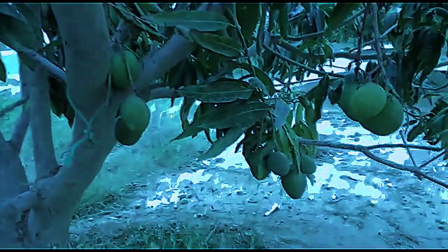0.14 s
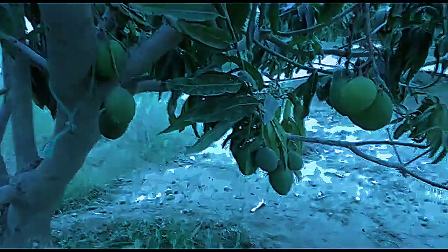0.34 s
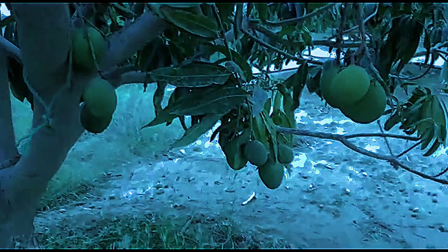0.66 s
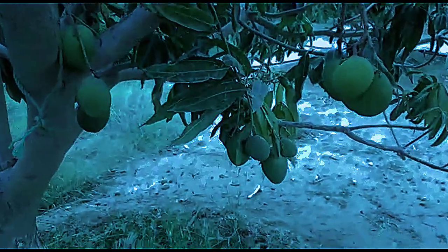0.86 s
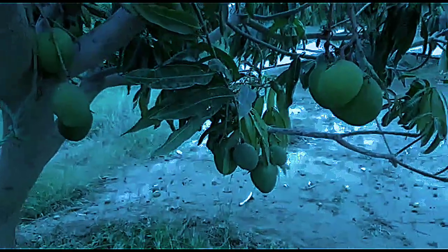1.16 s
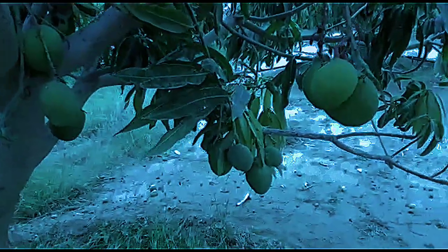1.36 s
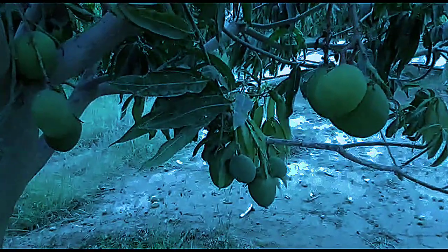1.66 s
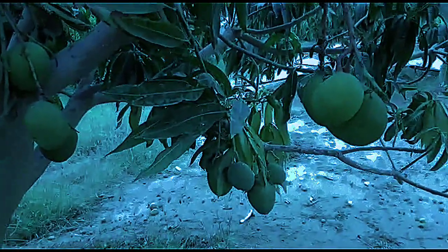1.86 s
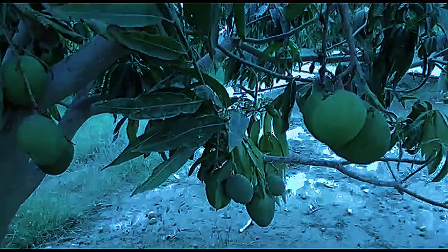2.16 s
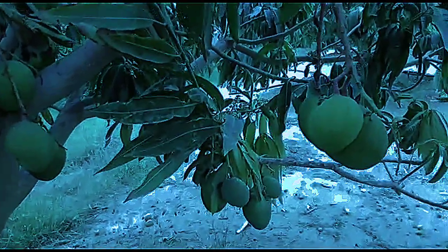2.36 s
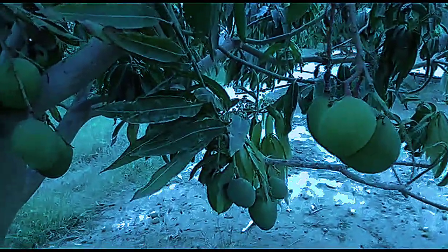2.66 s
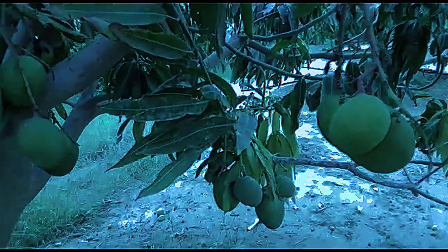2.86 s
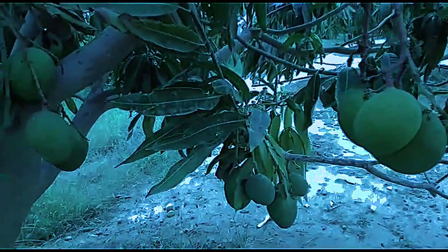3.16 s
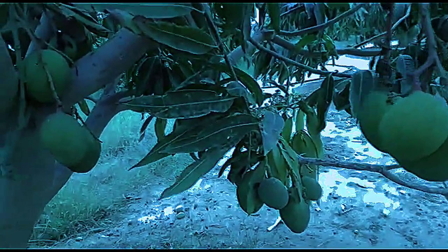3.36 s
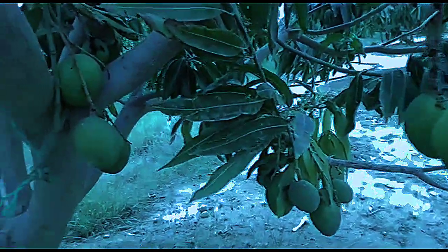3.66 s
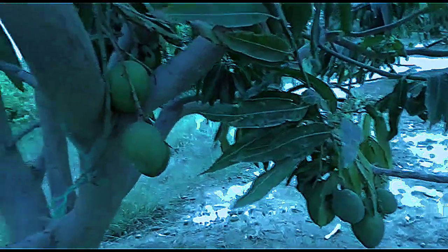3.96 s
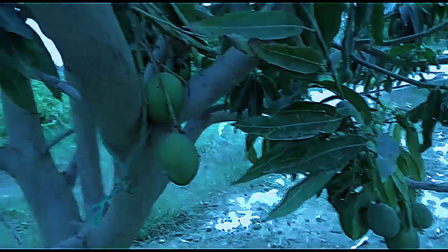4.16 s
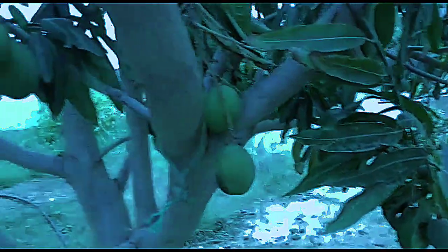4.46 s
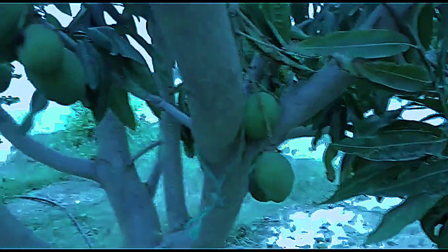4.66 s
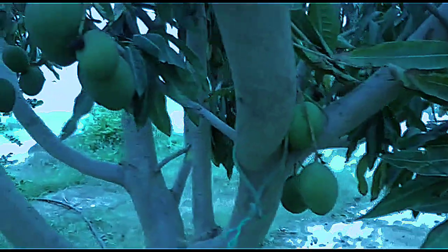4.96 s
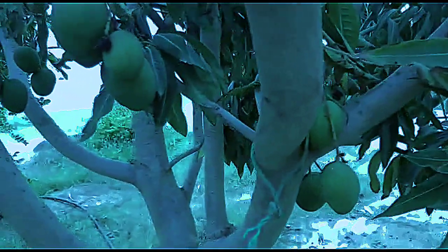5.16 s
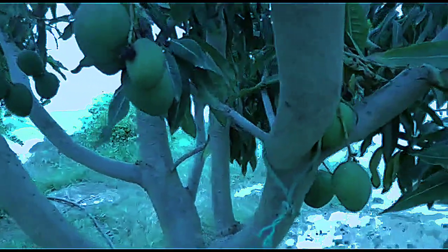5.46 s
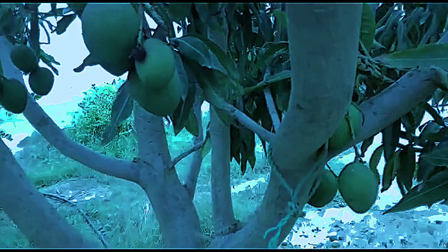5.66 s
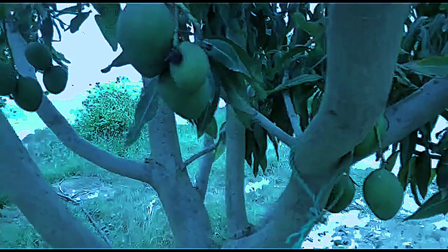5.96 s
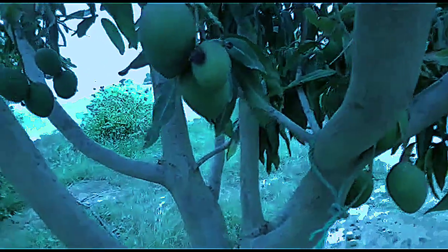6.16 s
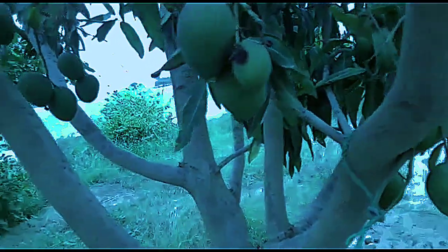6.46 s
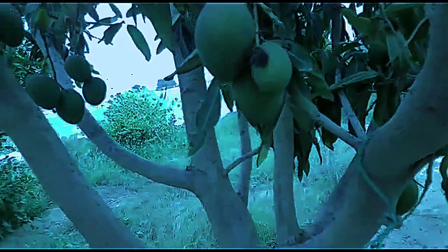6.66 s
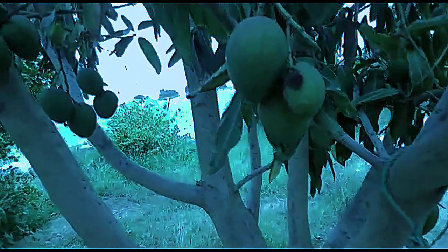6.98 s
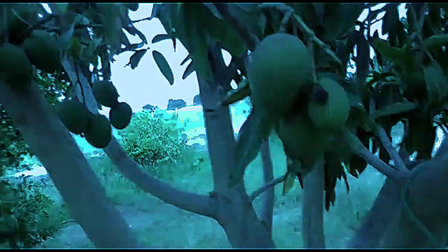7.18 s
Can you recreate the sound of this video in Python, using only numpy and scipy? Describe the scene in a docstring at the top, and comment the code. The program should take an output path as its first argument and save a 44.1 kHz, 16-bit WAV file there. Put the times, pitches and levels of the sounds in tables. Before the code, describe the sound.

Outdoors among fruit trees, birds chirp and squawk in an irregular stream, each raspy call drawing a fainter reply. Low rumble, wind on the microphone and faint far twitter lie behind them. Short mellow whistles from one bird peak just after a brief dropout near three seconds and stop around four. The chirping continues, with a sharp peep at five seconds and a tiny dry tick soon after.

```python
"""A flock chatters in an orchard: each cheep is a harsh squawk, a falling arch and a lower after-note,
and draws a fainter reply. Thin peeps and one bird's fluty whistles fall in between. Calls come from
vibrating syrinx membranes; leaves and trunks scatter them. Behind: far twitter, faint long tones, wind
buffeting, rumble, hiss, a distant hum and one dry tick.
Near 2.8 s the sound cuts out for a moment; the background swells back, the bass last."""
import sys
import numpy as np
from scipy import signal
from scipy.fft import rfft, irfft, next_fast_len
from scipy.io import wavfile
from scipy.ndimage import uniform_filter1d, map_coordinates

SR = 44100
rng = np.random.default_rng(int(sys.argv[2]) if len(sys.argv) > 2 else 0)


def master_out(mix):
    """Clip the mix to full scale and print it as 16-bit PCM to the path in sys.argv[1]."""
    frames = np.transpose(np.atleast_2d(mix))
    ceiling = np.clip(frames, -1, 1)
    pcm = np.round(ceiling * 32767).astype(np.int16)
    wavfile.write(sys.argv[1], SR, pcm)


N = 322812

# Flock calls. Each row: start in seconds, arch length in seconds, top pitch in Hz, arch level in dB,
# rasp 0-1, squawk level in dB, after-note level in dB.
CHEEPS = [(.01, .045, 5110, -15.5, 0.37, -24, -20.5), (.095, 0.059, 4930, -15.5, .8, -31.5, -22.5),
          (0.232, 0.059, 4730, -21, .9, -39, -32), (0.431, 0.059, 5370, -28, .7, -45, -36),
          (0.527, .042, 5200, -19, 0.34, -26.5, -23.5), (0.712, 0.097, 4695, -15.5, 0.56, -25, -21),
          (1.34, 0.059, 6290, -13, 0.5, -29.5, -13.5), (1.505, 0.068, 5050, -15.5, 0.37, -21.5, -15.5),
          (2.004, 0.11, 5330, -28, 0.65, -47, -31.5), (2.191, 0.095, 4954, -16, 0.99, -22, -22),
          (2.89, 0.069, 5460, -32.5, 0.62, -50, -29), (3.107, 0.042, 4680, -22, 0.38, -28, -22.5),
          (3.238, .045, 4956, -11.5, .2, -20.5, -28), (3.6, .07, 4800, -21, 0.76, -29, -28.5),
          (3.977, 0.061, 5130, -20, 0.32, -31.5, -24), (4.21, 0.093, 4834, -19.5, 0.84, -23.5, -21.5),
          (4.37, 0.053, 5060, -21.5, 0.65, -34.5, -28.5), (4.886, 0.056, 4350, -22, 0.37, -29.5, -21),
          (4.99, 0.12, 4470, -20.5, 0.49, -21, -25.5), (5.205, .07, 4200, -21, 0.3, -33.5, -30),
          (5.534, 0.056, 4510, -24.5, 0.28, -42, -35), (5.78, 0.11, 4410, -21, 1, -30.5, -34),
          (5.995, 0.076, 5020, -22.5, 0.82, -30, -30), (6.166, .06, 5120, -17.5, 0.2, -26.5, -25.5),
          (6.42, 0.057, 5050, -16.5, 0.26, -27.5, -20.5), (6.592, .075, 4720, -21.5, 0.9, -24, -29.5),
          (6.973, 0.072, 4780, -22.5, .4, -32, -20.5), (7.301, 0.065, 5520, -29, 0.4, -32.5, -30)]
# Background trend. Each row: time in seconds, rumble gain in dB, hiss gain in dB.
AIR_GAINS = [(0, -13.5, -29.5), (2.7, -14, -31), (3.4, -22.5, -26), (4.7, -21.5, -31.5),
             (7.3, -21.5, -30.5)]
ARCH_TURN, SLUR_TURN = .25, .38  # share of a note's length at which it reaches its main pitch


def amp(db):
    """Decibels to gain."""
    return 10 ** (np.asarray(db) / 20)


def unit(x):
    """Scale to rms 1."""
    return x / np.sqrt(np.mean(x ** 2) + 1e-20)


def along(points, hz):
    """Interpolate (Hz, value) points on a log axis."""
    knots_hz, values = np.transpose(points)
    return np.interp(np.log(hz + 1), np.log(knots_hz + 1), values)


def curves(rows):
    """One value per sample for each column after the time."""
    times_s, *columns = np.transpose(rows)
    return [np.interp(np.arange(N) / SR, times_s, column) for column in columns]


def wobble(rate_hz, size=N):
    """Smooth random curve, rate_hz knots a second."""
    knots = rng.standard_normal(size // 8 + 4)
    place = np.arange(size) * rate_hz / SR
    return map_coordinates(knots[:int(place[-1]) + 4], [place], mode="nearest")


def filtered(x, response):
    """Apply a gain given as a function of Hz."""
    size = next_fast_len(len(x) + 8192)
    return irfft(rfft(x, size) * response(np.fft.rfftfreq(size, 1 / SR)), size)[:len(x)]


def coloured(x, spectrum):
    """Equalise by (Hz, dB) points."""
    return filtered(x, lambda hz: amp(along(spectrum, hz)))


def noise(spectrum):
    """Coloured noise of rms 1."""
    return unit(coloured(rng.standard_normal(N), spectrum))


def add(track, start_s, sound):
    """Mix a sound into a track."""
    start = min(max(round(start_s * SR), 0), N)
    track[start:start + len(sound)] += sound[:N - start]


def progress(length_s):
    """Position 0-1 within a call, on a half-second buffer."""
    return np.minimum(np.arange(SR // 2) / SR / max(length_s, .005), 1)


def voiced(wave, u, edge):
    """Open and close a call softly; rms 1 while it lasts."""
    call = wave * np.abs(np.sin(np.pi * u)) ** edge
    return unit(call[u < 1])


def syrinx(glide_hz, twist, jitter, harmonics_db):
    """One vibrating membrane: its pitch twists and jitters about a glide."""
    size = len(glide_hz)
    hz = glide_hz * (1 + twist * wobble(150, size) + jitter * wobble(1200, size))
    phase = 2 * np.pi * np.cumsum(hz) / SR
    return sum(amp(db) * np.sin(k * phase) * (k * hz < SR / 2) for k, db in enumerate(harmonics_db, 1))


def syllable(length_s, pitches_hz, rasp, harmonics_db, edge, bow, turn=SLUR_TURN):
    """Three-pitch glide; rasp twists it, adds hiss and wakes the lower second side of the syrinx."""
    u = progress(length_s)
    start_hz, main_hz, end_hz = pitches_hz
    approach = np.abs(1 - u / turn) ** 1.5
    after = np.abs((u - turn) / (1 - turn))
    # bow 1 leaves the main pitch ever faster, bow 0 leaves at once and levels out
    leave = bow * after ** 2 + (1 - bow) * np.sin(np.pi / 2 * after) ** 1.4
    glide_hz = main_hz + np.where(u < turn, (start_hz - main_hz) * approach, (end_hz - main_hz) * leave)
    first = syrinx(glide_hz, .008 + .035 * rasp, .01 + .035 * rasp, harmonics_db)
    second = syrinx(.85 * glide_hz, .02 + .06 * rasp, .04, harmonics_db)
    hiss = rng.standard_normal(len(u))
    flutter = amp((1.5 + 2.5 * rasp) * wobble(380, len(u)))
    return voiced((first + rasp * (.75 * second + .3 * hiss)) * flutter, u, edge)


def slur(hz, slide_hz):
    """Start, main and end pitch of a note that does most of its slide early; both ends droop."""
    early_share, droop = .68, .0392
    ends_hz = hz * (1 - droop)
    return ends_hz - early_share * slide_hz, hz, ends_hz + (1 - early_share) * slide_hz


def scatter(x, early_db, tail_db, reach_s, perches=24):
    """Ground and trunks echo each perch differently; foliage adds a diffuse tail."""
    # Foliage decay. Each row: frequency in Hz, T60 in seconds.
    grove_t60 = [(500, 0.13), (2500, 0.79), (4200, 0.64), (9000, 0.53), (14000, 0.53)]
    out, hop = x.copy(), N // perches + 1
    for i in range(perches + 1):
        crossfade = np.clip(1 - np.abs(np.arange(N) / hop - i), 0, 1)
        first = max(i - 1, 0) * hop
        hz, t, spectra = signal.stft(rng.standard_normal(SR // 2), SR, nperseg=256)
        decay = amp(-60 * t / along(grove_t60, hz)[:, None])
        build_up = 1 - np.exp(-t / .045)
        tail = signal.istft(spectra * decay * build_up, SR, nperseg=256)[1]
        echo = amp(tail_db) * tail / np.linalg.norm(tail)
        lateness = rng.random(10) ** 2
        trunks = rng.standard_normal(10) * amp(-9 * lateness)
        delays_s = .001 + reach_s * lateness
        echo[(SR * delays_s).astype(int)] += amp(early_db) * trunks / np.linalg.norm(trunks)
        add(out, first / SR, signal.fftconvolve((x * crossfade)[first:(i + 1) * hop], echo))
    return out


def buffeting():
    """Wind on the microphone, with two short puffs."""
    # Spectrum. Each row: frequency in Hz, density in dB.
    spectrum = [(15, -5), (30, -1.5), (60, 0.5), (100, -2), (160, -11.5), (300, -24.5), (800, -101)]
    # Wind strength. Each row: time in seconds, gain in dB.
    wind = [(0, -16.5), (2.7, -13.5), (3.2, -18), (5.4, -20), (6.3, -15), (7.3, -18)]
    # Puffs. Each row: start in seconds, length in seconds, gain in dB.
    puffs = [(5.618, 0.045, -9), (6.822, 0.056, -11.5)]
    t = np.arange(N) / SR
    bumps = sum(amp(db) * np.exp(-(2 * (t - start_s) / length_s - 1) ** 2)
                for start_s, length_s, db in puffs)
    return (amp(curves(wind)[0] + .8 * wobble(12)) + bumps) * noise(spectrum)


def rumble():
    """Low, distant rumble."""
    # Spectrum. Each row: frequency in Hz, density in dB.
    spectrum = [(50, -27.5), (120, 1), (200, 0), (350, -0.5), (480, -6), (650, -13), (1100, -19.5),
                (3000, -46)]
    return amp(curves(AIR_GAINS)[0] + .5 * wobble(6)) * noise(spectrum)


def hum():
    """Distant hum: two tones waver in level and pitch."""
    # Tones. Each row: frequency in Hz, relative level in dB.
    tones = [(157, -33), (293, -28.5)]
    # Swell. Each row: time in seconds, gain in dB.
    swell = [(0, -26), (2.8, -1.5), (3.3, 2.5), (6, 3.5), (7.3, -9.5)]
    track = np.zeros(N)
    for hz, db in tones:
        gain = amp(db + 2 * wobble(14))
        phase = 2 * np.pi * np.cumsum(hz * (1 + .013 * wobble(20))) / SR
        track += gain * np.sin(phase)
    return track * amp(curves(swell)[0])


def open_air():
    """Hiss of open country."""
    # Spectrum. Each row: frequency in Hz, density in dB.
    spectrum = [(300, -24), (700, 0.5), (1400, -2.5), (2200, -1.5), (3000, -10.5), (5000, -6.5), (6800, -9),
                (8700, -6.5), (10500, -10.5), (12000, -15), (14000, -27.5)]
    return amp(curves(AIR_GAINS)[1] + .5 * wobble(4)) * noise(spectrum)


def far_flock(count=130):
    """Birds deeper in the orchard chirp at random."""
    track = np.zeros(N)
    for i, (when, size, pitch, bend, loud) in enumerate(rng.random((count, 5))):
        pitches_hz = (2600 + 2700 * pitch) * np.array([.87 + .32 * bend, 1, .8])
        call = syllable(.03 + .04 * size, pitches_hz, rasp=.45, harmonics_db=[0, -18], edge=.8, bow=.3)
        add(track, (i + when) * N / SR / count, amp(-40 + 2.4 * loud + 4 * pitch) * call)
    return scatter(track, early_db=-2, tail_db=-3, reach_s=.12)


def squawks():
    """Both sides of a forced syrinx swing apart: two twisting, sagging harmonic stacks in some noise."""
    # Squawk colour. Each row: frequency in Hz, gain in dB.
    colour = [(1500, -34), (2500, -22.5), (3500, 13), (5200, 14.5), (6500, 6), (8500, 7.5), (10300, 1.5),
              (11600, -4.5), (14000, -8)]
    lead_s, hold_s, third_harmonic_hz = .024, .05, 6474
    harmonics_db = [0, -3, -2, 0, -3, -6]
    track = np.zeros(N)
    for start_s, arch_s, _, _, _, db, _ in CHEEPS:
        u = progress(hold_s + .7 * arch_s)
        glide_hz = third_harmonic_hz / 3 * (1.04 + .3 * u - .42 * u * u)
        sides = np.zeros(len(u))
        for ratio in (1, 1.17):
            side = syrinx(glide_hz * ratio, twist=.065, jitter=.02, harmonics_db=harmonics_db)
            sides += side * amp(3.5 * wobble(170, len(u)))
        hiss = .45 * rng.standard_normal(len(u))
        call = voiced(unit(sides) + hiss, u ** .69, edge=.65)  # peaks early, fades slowly
        add(track, start_s - lead_s, amp(db) * call)
    return scatter(coloured(track, colour), early_db=-7, tail_db=-2.5, reach_s=.06)


def cheep_notes():
    """Each arch, its after-note and a farther bird's reply; raspy calls sink further."""
    pause_s, note_s, reply_loss_db = .004, .06, 5.5
    notes = []
    for start_s, length_s, top_hz, db, rasp, _, after_db in CHEEPS:
        wait, pitch, bend = rng.random(3)
        sag = 1 - .17 * rasp
        arch = np.array([.82, 1, .79 * sag])
        hump = np.array([.95, 1, .96 * sag + .0855 * (2 * bend - 1)])
        after_hz = (2010 + .45 * top_hz) * sag * hump
        reply_hz = (3893 + 700 * pitch) * arch
        reply_start_s = start_s + .13 + .08 * wait
        notes += [(start_s, length_s, top_hz * arch, db, rasp, ARCH_TURN),
                  (start_s + length_s + pause_s, note_s, after_hz, after_db, .894 * rasp, SLUR_TURN),
                  (reply_start_s, note_s, reply_hz, after_db - reply_loss_db, .55, ARCH_TURN)]
    return notes


def peep_notes(rasp=.22):
    """Short, thin notes that flick upward or stay nearly level."""
    # Each row: start in seconds, length in seconds, pitch in Hz, slide in Hz, level in dB.
    peeps = [(0.07, 0.031, 3810, 1100, -13.5), (.591, 0.025, 6860, 2026, -22),
             (0.615, 0.026, 4250, 810, -19), (0.821, 0.021, 4450, -400, -16),
             (1.761, 0.04, 4500, 1100, -22), (2.156, 0.019, 6000, 1800, -27),
             (4.194, .028, 5950, 700, -18.5), (4.901, 0.038, 5200, 1102, -14.5),
             (5.003, 0.03, 6480, -200, -6.5), (5.087, 0.026, 5300, 100, -16),
             (5.142, 0.019, 5300, 150, -20.5), (5.755, 0.045, 5900, 1500, -21.5),
             (5.975, 0.0238, 5200, 1400, -21), (6.272, .022, 3830, 700, -25),
             (6.47, 0.015, 5800, 1387, -22), (6.802, 0.067, 5450, 170, -28)]
    return [(start_s, length_s, slur(hz, slide_hz), db, rasp, SLUR_TURN)
            for start_s, length_s, hz, slide_hz, db in peeps]


def chirps():
    """Cheeps and peeps, clean to raspy; more of a faint bird's call arrives as echoes."""
    # Chirp colour. Each row: frequency in Hz, gain in dB.
    colour = [(2000, -1.5), (6500, 2), (7200, -7), (8700, 0), (10500, 3), (11600, -4.5), (14000, -16)]
    near, far = np.zeros(N), np.zeros(N)
    for start_s, length_s, pitches_hz, db, rasp, turn in cheep_notes() + peep_notes():
        call = syllable(length_s, pitches_hz, rasp, [0, -19.5, -26], edge=.45, bow=.1, turn=turn)
        add(near if db > -21 else far, start_s, amp(db) * call)
    near = scatter(near, early_db=-6, tail_db=-12, reach_s=.12)
    far = scatter(far, early_db=-2, tail_db=-5, reach_s=.05)
    return coloured(near + amp(-2) * far, colour)


def whistles():
    """One bird's mellow, burred slurs, with a thin glint on the fourth harmonic."""
    # Each row: start in seconds, length in seconds, pitch in Hz, slide in Hz, level in dB.
    notes = [(0.166, 0.046, 2710, 0, -17.5), (0.298, 0.1, 2460, -380, -22), (0.415, 0.038, 2610, -690, -27),
             (1.23, 0.061, 2350, 288, -30), (1.723, 0.027, 1820, 160, -31), (1.88, 0.052, 2390, 193, -23.5),
             (2.071, .052, 2594, 405, -18.5), (2.277, .049, 2120, -100, -33.5),
             (2.525, 0.018, 2250, 65, -22), (2.591, 0.069, 2660, 250, -24),
             (2.645, 0.079, 2474, -420, -24.5), (2.98, 0.035, 1850, 70, -31), (3.12, .057, 2422, 210, -7.5),
             (3.175, 0.048, 2343, 296, -18), (3.246, 0.023, 1830, -92, -24), (3.31, 0.051, 2608, 398, -7.5),
             (3.343, 0.07, 2974, 60, -18), (3.527, 0.021, 2140, 496, -14.5),
             (3.591, 0.038, 2580, -590, -20), (3.659, 0.026, 2046, -380, -24.5),
             (3.733, 0.032, 2280, 318, -12), (3.818, 0.051, 2664, 1, -14.5),
             (3.866, 0.046, 2930, -250, -21), (3.903, .05, 2395, -570, -13)]
    track = np.zeros(N)
    for start_s, length_s, hz, slide_hz, db in notes:
        call = syllable(length_s, slur(hz, slide_hz), rasp=.18,
                        harmonics_db=[0, -26, -30, -20, -28], edge=.75, bow=.8)
        add(track, start_s, amp(db) * call)
    return scatter(track, early_db=-10, tail_db=-17.5, reach_s=.07)


def far_tones():
    """Long, thin notes barely above the air."""
    # Each row: start in seconds, length in seconds, pitch in Hz, rms level in dB.
    notes = [(0.811, 0.54, 1576, -37.5), (4.423, 0.39, 1565, -45.5)]
    track = np.zeros(N)
    for start_s, length_s, hz, db in notes:
        size = int(length_s * SR)
        phase = 2 * np.pi * np.cumsum(hz * (1 + .0038 * wobble(40)[:size])) / SR
        add(track, start_s, amp(db) * np.sqrt(2) * np.sin(phase) * signal.windows.tukey(size, .5))
    return track


def tick(t60_s=.014, crest_db=11):
    """Tiny, dry snap close by: a burst of bright noise."""
    # Each row: start in seconds, nominal peak in dB.
    snaps = [(5.3867, -6)]
    # Spectrum. Each row: frequency in Hz, density in dB.
    spectrum = [(2000, -25), (6000, -8), (12000, 4), (14000, -15)]
    track, t = np.zeros(N), np.arange(SR // 10) / SR
    for start_s, peak_db in snaps:
        add(track, start_s, amp(peak_db - crest_db - 60 * t / t60_s) * noise(spectrum)[:len(t)])
    return track


def scene():
    """Birds among the trees, over a background that dips and swells back, the bass last."""
    # Dip and recovery, low and high layers. Each row: time in seconds, gain in dB.
    low_dip = [(2.8, -7.5), (2.88, -20.5), (3.02, -13), (3.13, -5.5), (3.16, -3)]
    high_dip = [(2.8, -1), (2.88, -20), (3.01, -2.5), (3.03, 8), (3.12, 0), (3.2, -2)]
    birds = squawks() + whistles() + chirps() + far_tones()
    low = (buffeting() + rumble() + hum()) * amp(curves(low_dip)[0])
    high = (open_air() + far_flock()) * amp(curves(high_dip)[0])
    return (birds + low + high + tick())[None]


def record(dry):
    """Brief dropout, clipping at full scale, steep low-pass."""
    mute_s, resume_s, cutoff_hz = 2.763, 2.888, 14600
    t = np.arange(N) / SR
    gate = uniform_filter1d(1. * ((t < mute_s) | (t > resume_s)), size=128)
    clipped = np.clip(dry[0] * gate, -1, 1)
    return filtered(clipped, lambda hz: 1 / (1 + (hz / cutoff_hz) ** 60))[None]


dry = scene()
out = record(dry)
master_out(out)
```